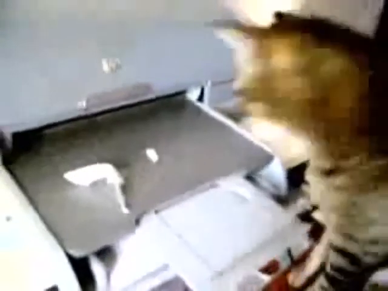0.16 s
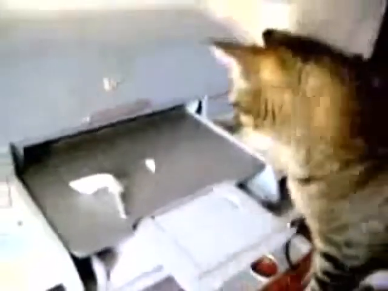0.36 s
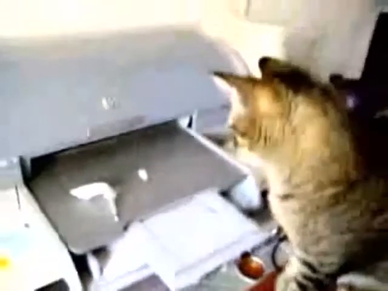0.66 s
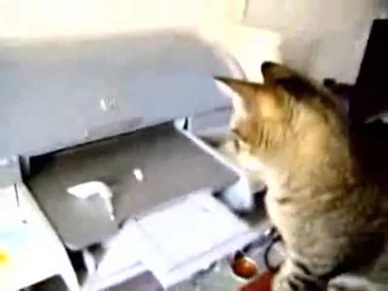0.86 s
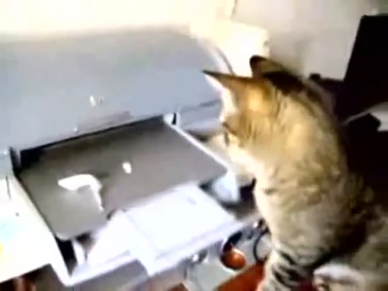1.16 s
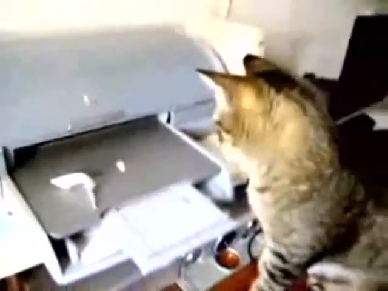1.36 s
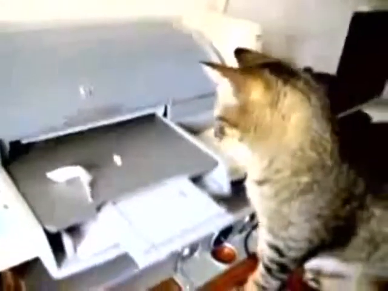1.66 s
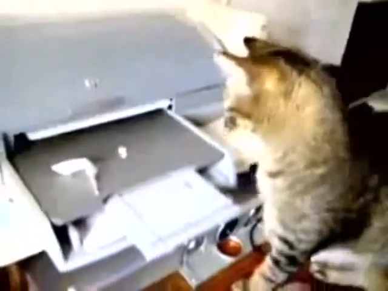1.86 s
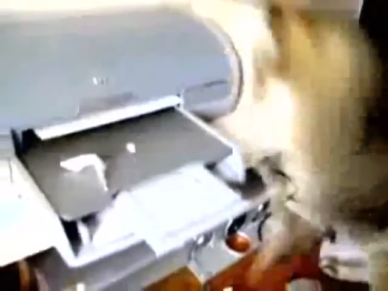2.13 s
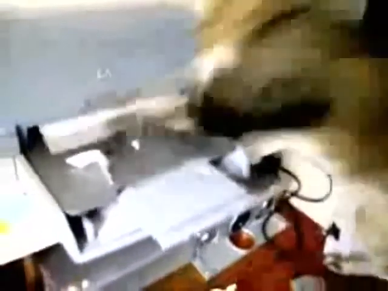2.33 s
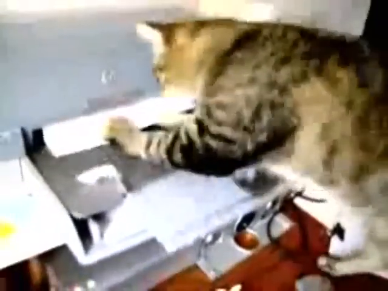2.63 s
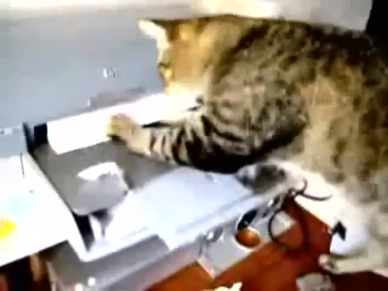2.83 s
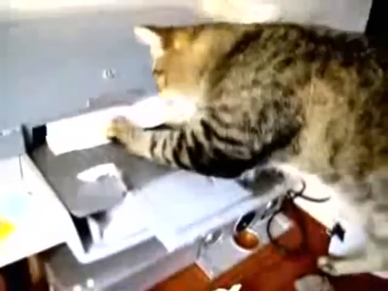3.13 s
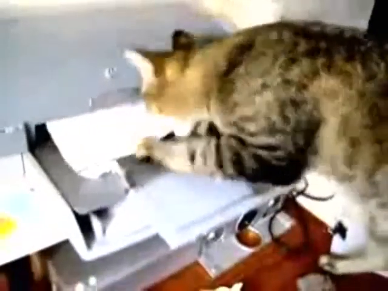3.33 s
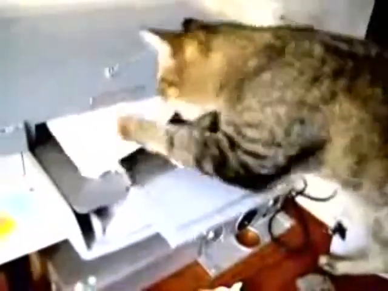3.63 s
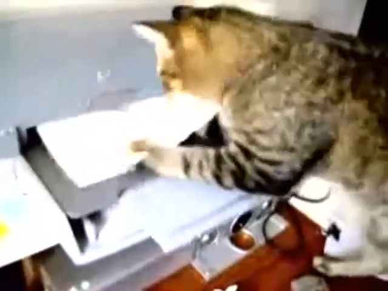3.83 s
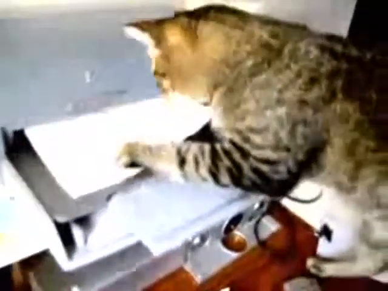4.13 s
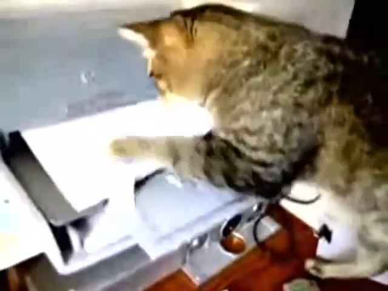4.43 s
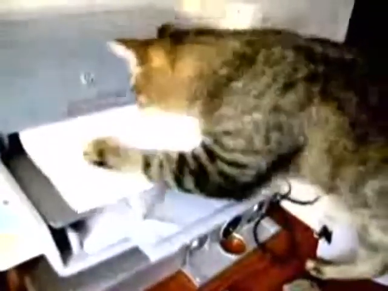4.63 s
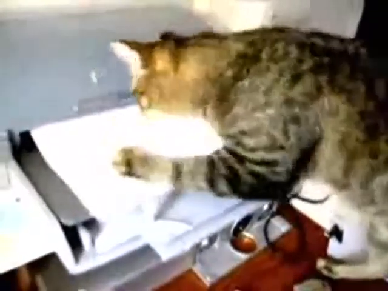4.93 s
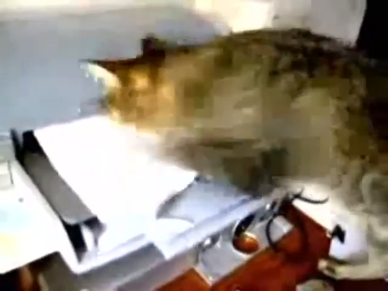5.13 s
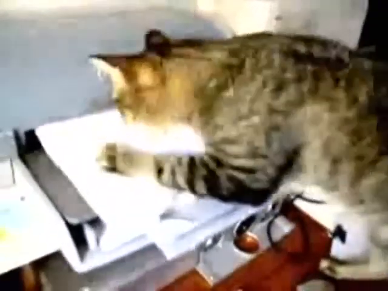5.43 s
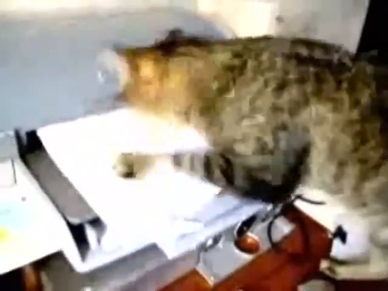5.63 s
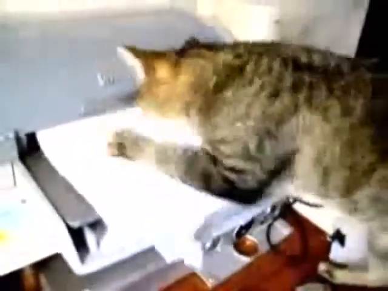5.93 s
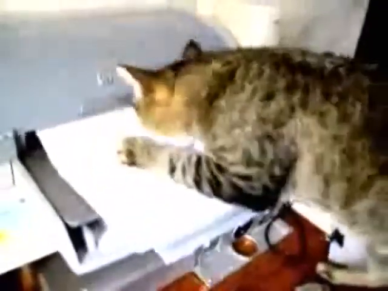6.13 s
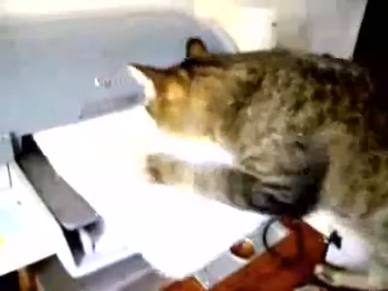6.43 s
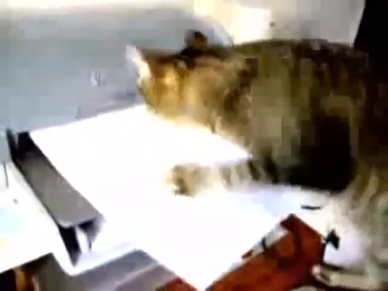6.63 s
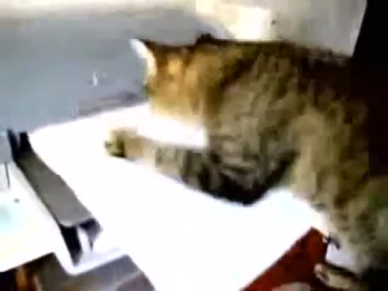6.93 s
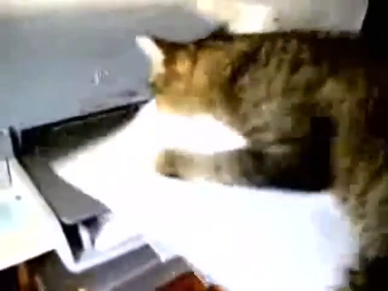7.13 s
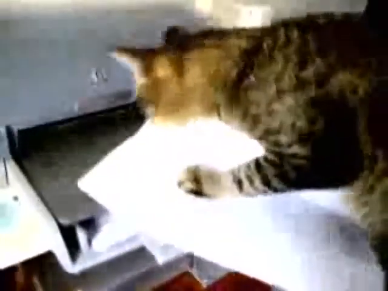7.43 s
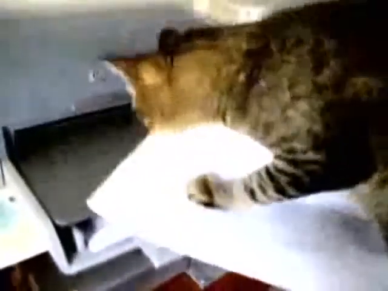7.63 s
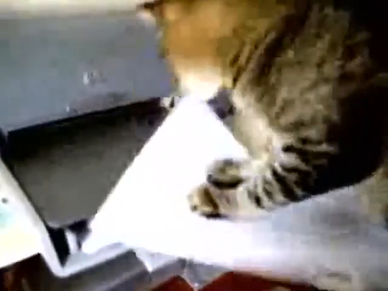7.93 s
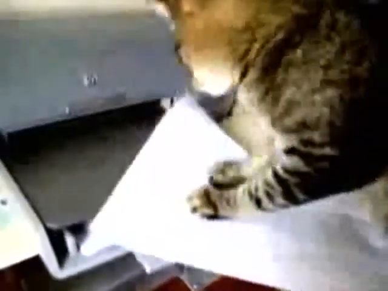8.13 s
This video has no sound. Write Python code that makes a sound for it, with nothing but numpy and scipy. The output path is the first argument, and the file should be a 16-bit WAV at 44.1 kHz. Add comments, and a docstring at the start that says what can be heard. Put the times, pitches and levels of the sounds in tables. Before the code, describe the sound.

Rollers rattle a page in, then rhythmic printing continues in a small room as a cat bats the paper and thumps the hollow tray.

```python
"""First the rollers of an inkjet printer rattle a sheet in, with two knocks on the plastic output tray.
Then five times a second the rollers step the sheet on, and in between the carriage motor whines.
A cat paws at the emerging sheet, knocks on the tray and at last drags the page out.
Gears and paper are filtered showers of tiny clicks; whine, rings and hum are sine waves.
A small room answers, and the sound is dull: a steep low-pass, with the hardest peaks rounded."""
import sys
import numpy as np
from scipy import signal
from scipy.fft import rfft, irfft, next_fast_len
from scipy.io import wavfile
from scipy.ndimage import uniform_filter1d

SR = 44100
rng = np.random.default_rng(int(sys.argv[2]) if len(sys.argv) > 2 else 0)


def put_to_file(sound):
    """Save the sound as 16-bit audio at rate SR, in the file named by the first command-line argument."""
    columns = np.atleast_2d(sound).T  # one column per channel
    safe = np.clip(columns, -1, 1)
    whole_steps = np.round(safe * 32767)
    wavfile.write(sys.argv[1], SR, whole_steps.astype(np.int16))


N = 365588
TIME = np.arange(N) / SR  # seconds
CUTOFF_HZ = 7850  # steep low-pass over the whole sound

# Colour of the room noise: (frequency [Hz], relative level [dB per Hz])
ROOM_COLOUR = [(20, -14), (30, 2.5), (60, -1.5), (110, 2), (170, -6.5), (260, -1.5), (560, -9.5),
               (900, -7.5), (1300, -14.5), (1900, -26.5), (2900, -23.5), (3800, -37), (4900, -41),
               (5600, -84)]
# Slow course of the room noise, which also wavers: (time [s], level [dB])
ROOM_LEVEL = [(0, -37.5), (2.2, -40.5), (3, -34), (4.3, -38), (6, -35.5), (7, -34.5), (8.1, -34.5),
              (8.29, -38.5)]
# Wavering hum tones: (middle frequency [Hz], middle level [dB])
HUM_TONES = [(63, -50), (124, -52.5), (249, -48), (503, -55), (684, -63)]

# Colours of rattling gears, flapping sheet, crackling paper, dull thud, low trembling,
# and a hard contact of claw or sheet edge: (frequency [Hz], relative level [dB per Hz])
GEAR_COLOUR = [(100, -15), (200, -15), (380, -4), (500, -3), (620, -2.5), (790, -1.5), (1030, -2.5),
               (1230, -4), (1350, -14.5), (1650, -23), (2000, -19.5), (3200, -32.5), (5000, -74.5)]
SHEET_COLOUR = [(70, -24.5), (130, -11.5), (280, -3.5), (450, -2), (700, 4.5), (1050, 6.5), (1350, -3),
                (1650, -29.5), (2100, -5), (3000, -57.5), (6000, -63.5)]
CRACKLE_COLOUR = [(300, -49), (900, -17), (1600, 4.5), (2100, -3.5), (2700, 6), (3250, 1), (3700, -10.5),
                  (4300, -18), (5000, -16), (5600, -37.5), (6100, -53), (6700, -16), (7100, -27.5),
                  (7600, -57)]
THUD_COLOUR = [(50, -28), (120, 7.5), (190, 8), (330, 7.5), (500, 2), (800, -57), (2500, -89)]
SHAKE_COLOUR = [(20, -11.5), (40, -2), (62, 5.5), (90, 0.5), (125, -10), (175, -6), (255, -6.5),
                (400, -16.5), (1000, -50), (3000, -78)]
TICK_COLOUR = [(200, -18.5), (600, -4.5), (1000, 6.5), (1500, 4), (2000, -5.5), (2800, 10.5), (3400, -13.5),
               (4200, -27.5), (5200, -29.5), (6000, -41.5), (7000, -32.5), (7800, -46.5)]

# Resonances of the printer casing, and of the output tray under the sheet:
# (frequency [Hz], width [Hz], level relative to the direct sound [dB])
CASING_RESONANCES = [(277, 14, -3.5), (440, 24, -1.5), (670, 230, -2), (792, 76, -1.5), (1012, 39, 7.5),
                     (1227, 33, -9.5), (2400, 200, -17.5), (2860, 290, -12.5)]
TRAY_RESONANCES = [(505, 1.2, 14.5), (678, 4.5, 2.5), (755, 28, -5), (1090, 78, -9.5), (1540, 110, -7.5),
                   (1750, 25, -13), (2750, 35, -23), (3370, 37, -14)]

# The rollers draw the sheet in: (start [s], length [s], gear rattle [dB])
INTAKE = [(0, 0.022, -27.5), (0.046, 0.3, -27), (0.386, 0.085, -28.5)]
# The roller steps change in level as the sheet comes out: (time [s], gear rattle [dB])
STEP_LEVEL = [(.6, -34), (1, -33.5), (2.2, -33), (3.6, -31.5), (4.4, -35), (6.1, -35.5)]
# The first carriage pass, straight after the intake, is the longest:
# (start [s], length [s], whine [dB])
FIRST_PASS = (.464, 0.123, -37.5)

# Knocks of the paw on sheet and tray: (time [s], blow strength [dB], main ring [Hz],
# ring and body modes [dB], ring 60 dB decay [s], hollow modes [dB], click modes [dB],
# paper snap relative to the blow, before snap_db [dB], clatter 60 dB decay [s])
KNOCKS = [(.095, -11.5, 1044, -12, 0.047, -40, -36, -11, 0.046),
          (.1022, -8, 1080, -9.5, 0.054, -37, -25, -16, 0.039),
          (2.315, -30, 1015, -25, 0.083, -53, -53, -11.5, 0.14),
          (2.375, -12.5, 1120, -22, .05, -37, -15.5, -3, 0.058),
          (2.393, -26, 1075, -26, .04, -37, -20, -10, .03),
          (2.401, -13.5, 715, -17, .07, -32, -17, -1.5, 0.15),
          (2.4373, -13.5, 997, -14, .04, -32, -14.5, -7, 0.025),
          (2.453, -14, 970, -24.5, .05, -33, -17, -1.5, 0.056),
          (2.459, -20, 1000, -15, .05, -33, -25, -2, .04),
          (2.486, -15, 1030, -21, .07, -29, -23, -2.5, 0.082),
          (2.626, -13.5, 1013, -16, 0.046, -33, -38, -9, 0.031),
          (2.641, -11, 880, -15, 0.039, -26, -28, -8, 0.024),
          (2.728, -16.5, 1085, -29, .06, -28, -27, -6, 0.15),
          (2.758, -22, 677, -17, 0.16, -20, -21, -11, 0.032),
          (2.772, -21, 685, -12.5, .06, -33, -23, -23, .059),
          (2.855, -10, 1010, -16, 0.062, -19, -23, -18, 0.08),
          (2.872, -19, 690, -15, 0.056, -46, -49, -28, 0.025),
          (2.939, -19, 990, -25, 0.059, -27, -28, -11, 0.04),
          (2.947, -16.5, 503, -21.5, 0.088, -22, -38, -19, 0.1),
          (3.017, -17.5, 905, -28, .05, -41, -46, -22, .05),
          (3.164, -18, 705, -22, 0.1, -32.5, -41, -28, 0.054),
          (3.181, -21, 674, -26.5, 0.086, -34, -33, -5.5, 0.037),
          (3.454, -17, 760, -23, 0.1, -24, -21, -2.5, 0.097),
          (3.713, -13.5, 670, -15, .07, -39, -35, -11, .082),
          (3.744, -13, 790, -13, .05, -32, -34, -14, .047),
          (3.756, -11.5, 695, -14.5, 0.16, -30, -33, -8.5, 0.19),
          (4.073, -26, 1038, -28, 0.078, -43, -35, 2.5, 0.047),
          (4.524, -24, 1020, -28, 0.044, -37.5, -35, -14, 0.08),
          (4.537, -13.5, 760, -20, 0.11, -18, -26, -3, .076),
          (4.669, -15, 1013, -11, 0.033, -38, -47, -11.5, 0.13),
          (4.885, -23, 1120, -23, .04, -40, -47, -26, .022), (5.2, -27, 693, -29, 0.067, -30, -41, -7, .05),
          (5.239, -22, 950, -20, 0.072, -27, -33, -6, .046),
          (5.754, -10, 1033, -8, 0.038, -38.5, -30.5, -12, 0.059),
          (5.843, -12.5, 880, -21, .04, -42, -34, -18, 0.039),
          (5.861, -22, 1016, -22, 0.076, -34.5, -36, -15, .061),
          (5.906, -15.5, 1055, -16, .04, -22.5, -21, -11, 0.043),
          (6.178, -20, 876, -28, 0.11, -36, -32.5, -7.5, 0.21),
          (6.279, -8.5, 1032, -17, 0.08, -37, -20, -10, 0.073),
          (6.314, -10.5, 1040, -13, 0.086, -26, -35, -11, 0.1),
          (6.327, -13.5, 862, -10, 0.059, -27.5, -27, -11, 0.036),
          (6.338, -16, 810, -20, 0.067, -33, -35, -27, 0.055),
          (6.42, -27, 1100, -15.5, .05, -37, -21.5, -7, 0.034),
          (6.783, -13, 866, -20, .05, -36.5, -24, -14, 0.041),
          (6.809, -16.5, 766, -23, 0.066, -38, -28, -5, .05),
          (6.876, -26, 905, -32, .04, -39, -29, 0.5, .035), (6.89, -24, 946, -33, .04, -36, -29, -3, .03),
          (6.897, -10, 970, -19.5, 0.058, -32, -33, -15.5, 0.066),
          (6.966, -23.5, 730, -25, .04, -28, -17, 0, 0.052),
          (6.993, -14.5, 546, -21, 0.053, -27, -35, -7, 0.089),
          (7.029, -2.5, 791, -6.5, 0.088, -14.5, -18, -18, .065),
          (7.061, -15, 800, -22.5, .07, -30, -30, -15, .065),
          (7.319, -11, 1180, -10.5, 0.07, -32, -22, -6, 0.15),
          (7.369, -16, 1064, -20, 0.075, -28, -39, -11.5, 0.15),
          (7.751, -6, 1047, -11, .07, -39, -24.5, -12, 0.066),
          (7.826, -16.5, 1157, -16.5, .06, -47, -37, -15, 0.059),
          (7.865, -17, 725, -23, 0.074, -39, -41, -25, 0.066)]
# Notes of the struck tray, low to high, detuned a little at every blow:
# (frequency [Hz], relative level [dB], 60 dB decay [s])
BODY_MODES = [(240, -19.5, .08), (694, -17, 0.054), (798, -7, .05), (1023, -18, 0.06), (1166, -9, 0.072)]
HOLLOW_MODES = [(1414, -2, 0.045), (1572, -1, 0.044)]
CLICK_MODES = [(2480, -1, 0.023), (2714, 0.5, 0.029), (3220, -5.5, .025)]

# Short wavering notes: the rubbed sheet, and one low tray boom near 128 Hz:
# (start [s], length [s], pitch halfway through [Hz], level [dB])
WAVERING_NOTES = [(0.288, 0.053, 564, -31), (2.425, 0.071, 1312, -29), (2.855, 0.031, 748, -27),
                  (2.949, 0.098, 500, -35), (3.165, 0.081, 678, -33.5), (4.53, 0.065, 1470, -38),
                  (5.211, 0.081, 1330, -34), (6.648, 0.064, 580, -31.5), (6.889, 0.098, 128.3, -30.5),
                  (7.061, 0.048, 321, -29), (7.32, .065, 1041, -28.5), (7.448, 0.06, 548, -32.5),
                  (7.855, 0.047, 426, -31.5)]
# A low handling rumble swells and fades: (start [s], length [s], level [dB])
HANDLING = (1.32, 1.9, -39.5)
# Strokes of the paw over the sheet; rustle() trims the three levels:
# (start [s], length [s], flapping [dB], crackle [dB], tray rumble [dB])
STROKES = [(2.346, 0.021, -27, -32, -28), (2.364, 0.059, -20.5, -39, -15), (2.437, 0.06, -18.5, -30.5, -36),
           (2.529, 0.019, -34, -32.5, -22), (2.62, 0.018, -24, -40, -41.5), (2.719, 0.1, -26, -39.5, -28.5),
           (2.858, 0.044, -34.5, -46, -23.5), (2.904, 0.031, -25.5, -31, -48), (3, 0.1, -32, -40, -36),
           (3.152, 0.091, -31, -37.5, -30.5), (3.253, 0.056, -42, -37.5, -42.5),
           (3.414, 0.13, -30.5, -40, -38), (3.619, 0.066, -27.5, -43, -29),
           (3.714, 0.069, -21.5, -27, -17.5), (3.803, 0.02, -43, -42, -26), (4.185, 0.048, -42, -49.5, -31),
           (4.51, 0.098, -26, -34, -28), (4.745, 0.23, -36.5, -42.5, -62), (4.995, 0.1, -41, -48, -35.5),
           (5.156, 0.031, -30, -41.5, -34), (5.184, 0.12, -28.5, -34, -29), (5.322, 0.17, -38, -45.5, -52),
           (5.721, 0.024, -29, -34, -31), (5.749, 0.035, -25, -29.5, -22.5), (5.839, 0.068, -25, -51, -29),
           (5.907, 0.05, -25, -32, -39), (6.255, 0.024, -34, -41, -42), (6.297, 0.046, -25, -31.5, -21),
           (6.384, 0.084, -25.5, -38.5, -28), (6.563, 0.077, -42, -36, -56), (6.641, 0.023, -23, -44, -40),
           (6.749, .025, -30, -36.5, -38.5), (6.775, 0.041, -22, -30, -21),
           (6.859, 0.021, -27.5, -33.5, -39), (6.895, 0.077, -28, -33.5, -38),
           (7.017, 0.055, -20.5, -31.5, -24.5), (7.146, 0.13, -32.5, -45, -32),
           (7.302, 0.094, -21, -30, -22), (7.44, 0.24, -29, -41.5, -34), (7.707, 0.12, -26, -40.5, -45),
           (7.853, 0.13, -27, -41, -41), (8.046, 0.077, -28, -44.5, -27)]

# Printing repeats a carriage pass and a roller step; times are for the middle of each
FIRST_STEP_S, CYCLE_S, PASS_LEAD_S = .636, .2013, .083
STEP_S, PASS_S = 0.076, 0.086
# Steps alternate: one early and long, the next late and short
SWING_S, SWING_SHARE = 0.0064, 0.11
STEP_HISS_DB = -13.5  # paper hiss relative to the gear rattle
WHINE_HZ = 844  # each pass arches from about 7% below this to 1% above, with some wobble
WHINE_DB, WHINE_FADE_DB_PER_S = -39.3, 0.25  # level at time zero, and its slow fade

# A hard first contact ticks; the tick grows faster than the blow
TICK_DB, TICK_GROWTH = -8.5, 1.48  # peak dB at a full-scale blow, dB per dB
SNAP_RISE_S = .0012  # the paper snaps almost at once
NOTE_FALL_OCTAVES_PER_S = 1.8  # each wavering note sinks
# In every stroke the paw grips, eases off while it slides, and lets go
GRIP_S, EASE_DB_PER_S, LET_GO_DB_PER_S = 0.018, 11, 335
# Claws catch now and then during a stroke
CLAWS_PER_S, CLAW_DB = 45, -11  # level relative to the untrimmed crackle


def from_db(db):
    """Turn decibels into gain."""
    return 10 ** (np.asarray(db) / 20)


def rms_one(x):
    """Scale to unit power."""
    return x / np.sqrt(np.mean(x ** 2) + 1e-20)


def in_time(rows):
    """Spread each column of a curve over every sample."""
    s, *columns = np.transpose(rows)
    return [np.interp(TIME, s, column) for column in columns]


def add(track, s, sound):
    """Mix a sound into the track at time s."""
    at = int(np.clip(round(s * SR), 0, N - 1))
    track[at:at + len(sound)] += sound[:N - at]


def drift(rate):
    """Wander smoothly by chance, with spread 1 and a new target rate times a second."""
    return np.interp(TIME * rate, np.arange(4000), rng.standard_normal(4000)) / np.sqrt(2 / 3)


def response(colour, size=4096):
    """Make the unit-energy impulse response of a colour that starts as promptly as it can."""
    hz, db = np.transpose(colour)
    log_hz = np.log(np.maximum(np.arange(size // 2 + 1) * SR / size, 1))
    gain = from_db(np.interp(log_hz, np.log(hz), db))
    # folding the cepstrum forward in time gives minimum phase
    cepstrum = irfft(np.log(gain))
    cepstrum[1:size // 2] *= 2
    cepstrum[size // 2 + 1:] = 0
    return rms_one(irfft(np.exp(rfft(cepstrum)))) / np.sqrt(size)


def through(x, impulse):
    """Play x through an impulse response."""
    return signal.fftconvolve(x, impulse)[:len(x)]


def resonate(x, hz, width_hz):
    """Ring one resonance with gain 1 at its top."""
    r = np.exp(-np.pi * width_hz / SR)
    feedforward = np.array([1, 0, -1]) * (1 - r * r) / 2
    feedback = [1, -2 * r * np.cos(2 * np.pi * hz / SR), r * r]
    return signal.lfilter(feedforward, feedback, x)


def shell(x, modes):
    """Add the resonances of a hollow plastic part to the direct sound."""
    return x + sum(from_db(db) * resonate(x, hz, width) for hz, width, db in modes)


def grains(per_s, spread_db):
    """Scatter tiny clicks of either sign at random; spread_db makes their sizes uneven."""
    sizes = from_db(spread_db * np.minimum(rng.exponential(1, N), 4))
    sizes = sizes * rng.choice([-1, 1], N)
    return rms_one(sizes * (rng.random(N) < per_s / SR))


def even(x, window_s):
    """Hold the power steady over a short window, keeping the grain within it."""
    power = uniform_filter1d(x * x, max(int(window_s * SR), 2))
    return x / np.sqrt(np.abs(power) + 1e-9)


def shifting(x, depth_db, rate, count=20):
    """Let narrow, overlapping frequency bands swell and fade, each on its own."""
    size = next_fast_len(N)
    spectrum = rfft(x, size)
    place = count * np.sqrt(np.arange(len(spectrum)) * SR / size / CUTOFF_HZ)
    out = np.zeros(N)
    for k in range(count + 1):
        band = irfft(spectrum * np.clip(1 - np.abs(place - k), 0, 1), size)[:N]
        out += band * from_db(depth_db * drift(rate))
    return out


def arch(length_s, power):
    """Shape a smooth swell and fall with rounded feet."""
    hump = np.sin(np.linspace(0, np.pi, max(int(length_s * SR), 3))).clip(0)
    return hump ** power * np.tanh(10 * hump)


def swells(rows, power):
    """Place one arch for each (start [s], length [s], level [dB]) row."""
    level = np.zeros(N)
    for start, length, db in rows:
        add(level, start, from_db(db) * arch(length, power))
    return level


def background():
    """Quiet room noise, slightly restless in colour, and a hum of wavering sine tones."""
    air = through(rng.standard_normal(N), response(ROOM_COLOUR))
    air = rms_one(shifting(air, depth_db=4.0, rate=25))
    air = from_db(in_time(ROOM_LEVEL)[0] + 0.77 * drift(14)) * air
    hum = np.zeros(N)
    for hz, db in HUM_TONES:
        level = from_db(db + 1.7 * drift(14))
        hum += level * np.sin(2 * np.pi * np.cumsum(hz + 4 * drift(25)) / SR)
    return air + np.sqrt(2) * hum


def shake():
    """Low trembling: noise held at a steady power, as when a motor shakes the printer on the desk."""
    return even(through(rng.standard_normal(N), response(SHAKE_COLOUR)), window_s=0.017)


def cycles(count):
    """Give the time of each printing cycle and the carriage's direction (-1 back, 1 out)."""
    k = np.arange(count)
    return FIRST_STEP_S + CYCLE_S * k, -(-1) ** k


def roller_steps():
    """List (start [s], length [s], level [dB]) of one step per cycle."""
    middle, way = cycles(count=28)
    middle = middle + SWING_S * way
    length = STEP_S * (1 - SWING_SHARE * way)
    level = np.interp(middle, *np.transpose(STEP_LEVEL))
    return list(zip(middle - length / 2, length, level))


def feed(tooth_hz, swell, tooth_db, shake_db, intake_swell):
    """Gear teeth click and shake the casing while the sheet hisses: flatter swells, then step chuffs."""
    turns = np.cumsum(tooth_hz * (1 + 0.22 * drift(60))) / SR
    # one click each time another tooth goes by
    teeth = rms_one(np.diff(np.floor(turns), prepend=0) * from_db(4 * drift(300)))
    contacts = from_db(tooth_db) * teeth + grains(per_s=2500, spread_db=0)
    rattle = through(contacts, response(GEAR_COLOUR))
    hiss = through(grains(per_s=4100, spread_db=0), response(CRACKLE_COLOUR))
    rattle, hiss = (even(shell(shifting(x, depth_db=3.5, rate=50), CASING_RESONANCES), window_s=0.0092)
                    for x in (rattle, hiss))
    lumps = rms_one(from_db(1.5 * drift(170) + 1.5 * drift(60)))
    steps = roller_steps()
    drive = swells(INTAKE, intake_swell) + swells(steps, swell)
    turning = swells([(start, length, shake_db) for start, length, db in steps + INTAKE], swell)
    return drive * lumps * (rattle + from_db(STEP_HISS_DB) * hiss) + turning * shake()


def struck(modes, t, spread_db, detune):
    """Modes die away; each one's strength, sign and slight detuning are drawn at random per blow."""
    hz, db, t60 = np.transpose(modes)[:, :, None]
    strength, bend, side = rng.standard_normal((3, len(modes), 1))
    waves = np.sign(side) * np.sin(2 * np.pi * hz * (1 + detune * bend) * t)
    return np.sum(waves * from_db(db + spread_db * strength - 60 * t / t60), axis=0)


def knocks(clatter_db, snap_db, snap_decay, pad_s, punch, punch_s):
    """Knocks ring the tray through the paw's soft pad; a dying clatter flaps and snaps the sheet."""
    out, t = np.zeros(N), np.arange(SR // 4) / SR
    contacts = even(grains(per_s=3000, spread_db=2), window_s=0.0018)
    flaps = shell(through(contacts, response(SHEET_COLOUR)), TRAY_RESONANCES)
    flaps = even(shifting(flaps, depth_db=5.5, rate=32), window_s=0.011)
    creases = through(grains(per_s=3300, spread_db=1.5), response(CRACKLE_COLOUR))
    creases = even(shifting(creases, depth_db=6.0, rate=40), window_s=0.0047)
    tick = response(TICK_COLOUR)
    tick = tick / np.abs(tick).max()
    onset = 1 - np.exp(-t / pad_s)
    # the first contact is harder than those that follow
    blow = onset * (1 + punch * np.exp(-t / punch_s))
    for s, db, hz, ring_db, ring_t60, hollow_db, click_db, snap, t60 in KNOCKS:
        now = slice(int(s * SR), int(s * SR) + len(t))
        ring = np.sin(2 * np.pi * hz * t) * from_db(ring_db - 60 * t / ring_t60)
        groups = [(BODY_MODES, ring_db), (HOLLOW_MODES, hollow_db), (CLICK_MODES, click_db)]
        body = sum(from_db(level) * struck(modes, t, spread_db=1.0, detune=.012)
                   for modes, level in groups)
        clatter = rms_one(flaps[now] * blow * from_db(-60 * t / t60))
        snap_shape = (1 - np.exp(-t / SNAP_RISE_S)) * from_db(-60 * t / (t60 * snap_decay))
        crack = rms_one(creases[now] * snap_shape)
        add(out, s, onset * (ring + body))
        add(out, s, from_db(db + clatter_db) * clatter)
        add(out, s, from_db(db + snap + snap_db) * crack)
        add(out, s, from_db(TICK_DB + TICK_GROWTH * db) * tick)
    return out


def wavering_notes(width_hz, swell):
    """The rubbed sheet, and once the tray, sounds a sinking note that slow noise makes waver."""
    out = np.zeros(N)
    slow = signal.butter(2, width_hz, fs=SR, output="sos")
    for start, length, hz, db in WAVERING_NOTES:
        envelope = arch(length, swell)
        t = np.arange(len(envelope)) / SR
        pitch = hz * 2 ** (NOTE_FALL_OCTAVES_PER_S * (length / 2 - t))
        phase = 2 * np.pi * np.cumsum(pitch) / SR
        # keep the end of the slow noises, where the filter has settled
        waver = signal.sosfilt(slow, rng.standard_normal((2, SR // 4)))[:, -len(t):]
        note = rms_one(waver[0] * np.cos(phase) + waver[1] * np.sin(phase))
        add(out, start, from_db(db) * envelope * note)
    return out


def carriage_passes():
    """List (start [s], length [s], whine [dB]): the first pass, one before each later step, a last one."""
    middles = cycles(count=29)[0][1:] - PASS_LEAD_S
    later = [(s - PASS_S / 2, PASS_S, WHINE_DB - WHINE_FADE_DB_PER_S * s) for s in middles]
    return [FIRST_PASS] + later


def carriage(rail_db, shake_db, brake_db):
    """The motor speeds up and brakes: its whine arches in pitch and level, and the belt scuffs."""
    passes = carriage_passes()
    speed = swells([(start, length, 0) for start, length, db in passes], power=0.94)
    pitch = WHINE_HZ * (1.01 - .08 * (1 - speed) + .006 * drift(5) + .007 * drift(60))
    phase = 2 * np.pi * np.cumsum(pitch) / SR
    whine = from_db(1.2 * drift(5) + 2 * drift(70)) * np.sin(phase + .3 * drift(250))
    rail = through(grains(per_s=1400, spread_db=4.5), response(GEAR_COLOUR))
    rail = from_db(rail_db) * shell(rail, CASING_RESONANCES)
    stops = [(start + 0.67 * length, .03, brake_db) for start, length, db in passes]
    scuff = through(grains(per_s=750, spread_db=2.5), response(CRACKLE_COLOUR))
    scuff = swells(stops, power=1.0) * scuff
    moving = swells(passes, power=0.83) * (np.sqrt(2) * whine + rail)
    return moving + from_db(shake_db) * speed * shake() + scuff


def handling():
    """A low handling rumble swells and fades: the same low noise as the trembling."""
    return swells([HANDLING], power=0.21) * shake()


def stroke_levels():
    """Give the gains of flapping, crackle and tray rumble, which all follow the paw's pressure."""
    levels, t = np.zeros((3, N)), np.arange(SR // 2) / SR
    for start, length, *parts_db in STROKES:
        fall_db = EASE_DB_PER_S * t + LET_GO_DB_PER_S * np.maximum(t - length, 0)
        pressure = np.minimum(t / GRIP_S, 1) * from_db(-fall_db)
        for level, db in zip(levels, parts_db):
            add(level, start, from_db(db) * pressure)
    return levels


def rustle(body_db, crackle_db, lean_db):
    """Small creases and claw slips crackle and set the whole sheet flapping on the tray."""
    body, crackle, lean = stroke_levels()
    slips = grains(per_s=1400, spread_db=2.2)
    flaps = through(slips + grains(per_s=1500, spread_db=2.5), response(SHEET_COLOUR))
    creases = through(slips + grains(per_s=1200, spread_db=2.5), response(CRACKLE_COLOUR))
    # the paw catches and lets go, so the grains come in clumps
    catching = from_db(2.5 * drift(110) + 2 * drift(45))
    flaps, creases = (catching * shifting(x, depth_db=3.8, rate=55, count=28) for x in (flaps, creases))
    low = from_db(body_db) * body * even(shell(flaps, TRAY_RESONANCES), window_s=0.033)
    high = from_db(crackle_db) * crackle * even(shell(creases, TRAY_RESONANCES), window_s=0.079)
    thud = through(rng.standard_normal(N), response(THUD_COLOUR))
    rumble = from_db(lean_db) * lean * even(thud, window_s=0.13)
    claws = through(grains(per_s=CLAWS_PER_S, spread_db=1.0), response(TICK_COLOUR))
    return low + high + from_db(CLAW_DB) * crackle * claws + rumble


def tray_boom(start_s, hz, db, t60):
    """The hardest blow, as the sheet comes free, also sets the whole tray swinging: a dying sine."""
    t = np.maximum(TIME - start_s, 0)
    return from_db(db - 60 * t / t60) * np.sin(2 * np.pi * hz * t)


def room(x, t60, wet_db):
    """Desk and walls answer with a short diffuse tail of dying noise."""
    t = np.arange(SR // 2) / SR
    tail = rng.standard_normal(len(t)) * from_db(-60 * t / t60) * (t > .005)
    return x + from_db(wet_db) * through(x, tail / np.linalg.norm(tail))


def scene():
    """Put printer, cat and handling rumble in the room, over the background."""
    printer = feed(tooth_hz=335.4, swell=0.49, tooth_db=-1.0, shake_db=-36.5, intake_swell=0.18)
    paw = knocks(clatter_db=-25.0, snap_db=-22.0, snap_decay=1.0, pad_s=0.00052, punch=0.69, punch_s=0.0025)
    notes = wavering_notes(width_hz=41, swell=0.47)
    printer = printer + carriage(rail_db=-19.0, shake_db=-48.0, brake_db=-50.0)
    rumble = handling()
    paper = rustle(body_db=-3.0, crackle_db=-1.0, lean_db=-8.5)
    paw = paw + tray_boom(start_s=7.03, hz=125.5, db=-15.0, t60=0.27)
    indoors = room(printer + paw + notes + rumble + paper, t60=0.28, wet_db=-10.0)
    return (indoors + background())[None]  # one channel


def record(dry):
    """Round the hardest peaks, then dull the sound with a steep low-pass."""
    rounded = .8 * np.tanh(dry / .8)
    low_pass = signal.ellip(10, .2, 80, CUTOFF_HZ, fs=SR, output="sos")
    return signal.sosfilt(low_pass, rounded)


dry = scene()
out = record(dry)
put_to_file(out)
```